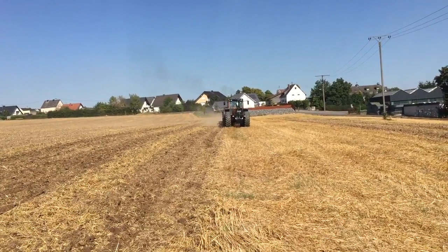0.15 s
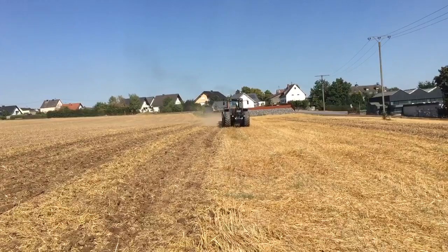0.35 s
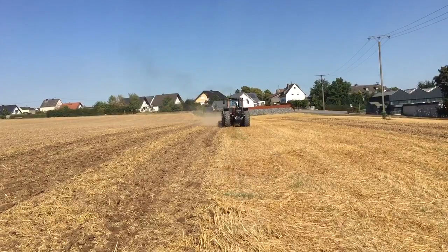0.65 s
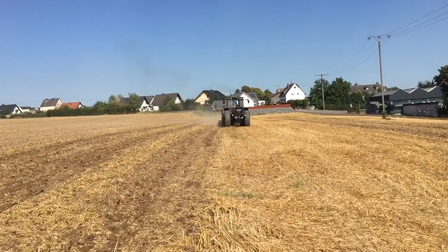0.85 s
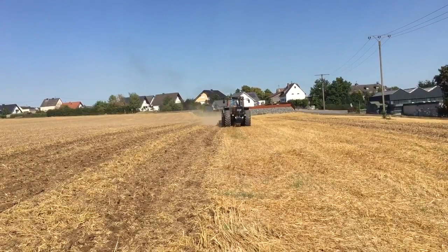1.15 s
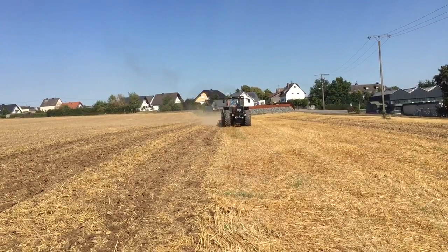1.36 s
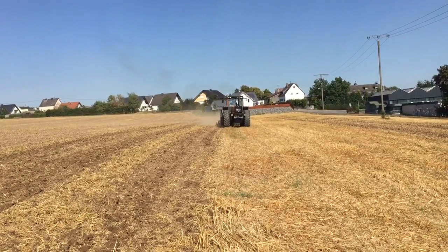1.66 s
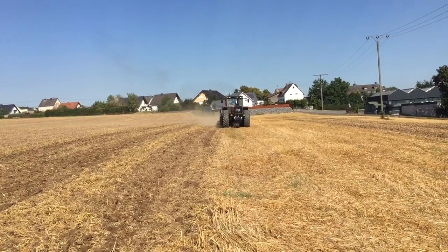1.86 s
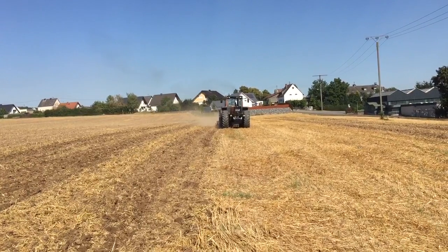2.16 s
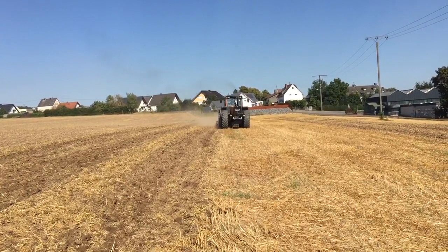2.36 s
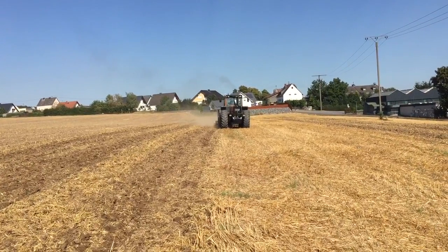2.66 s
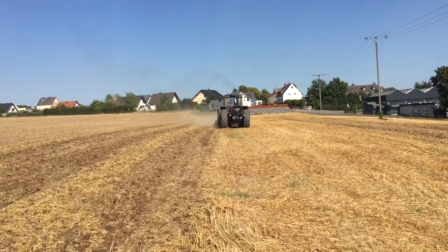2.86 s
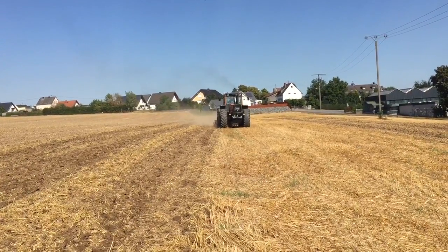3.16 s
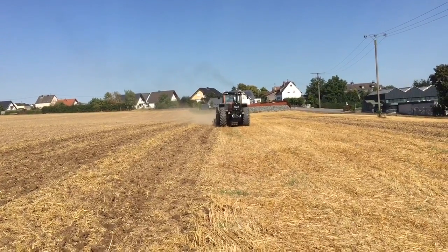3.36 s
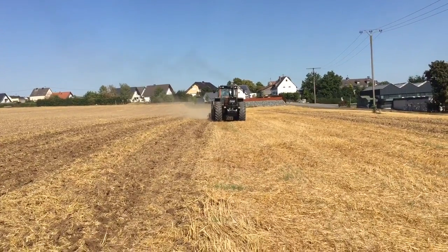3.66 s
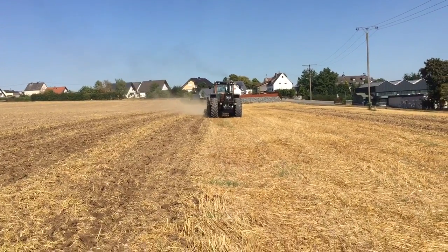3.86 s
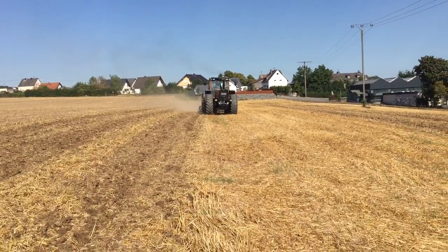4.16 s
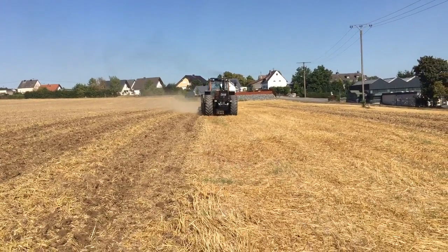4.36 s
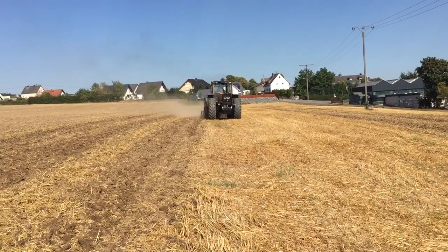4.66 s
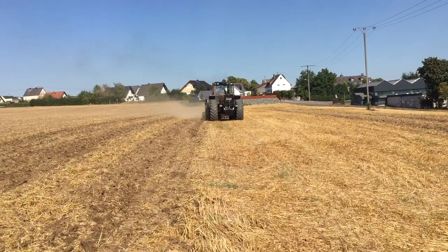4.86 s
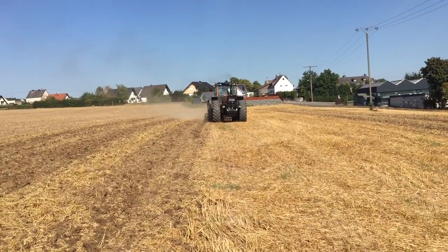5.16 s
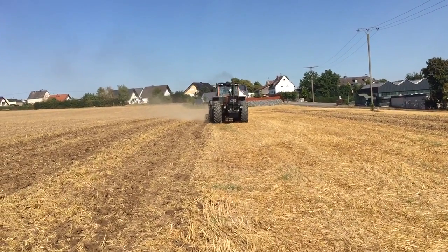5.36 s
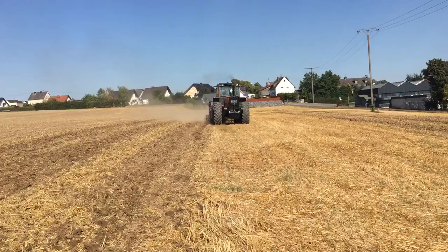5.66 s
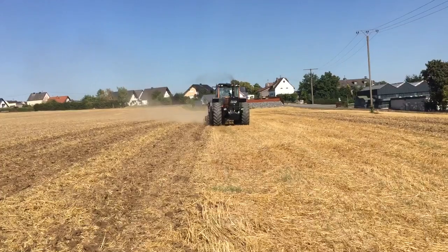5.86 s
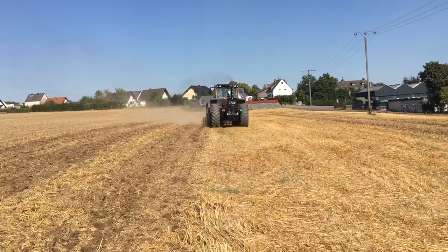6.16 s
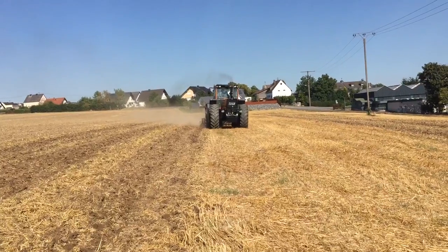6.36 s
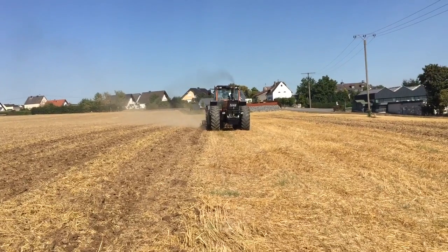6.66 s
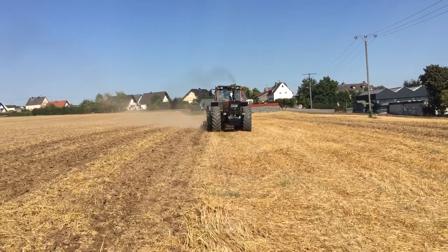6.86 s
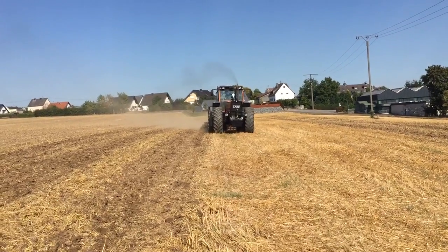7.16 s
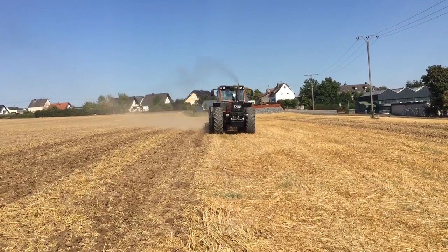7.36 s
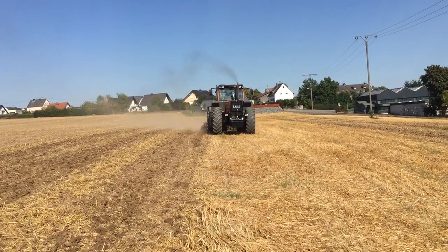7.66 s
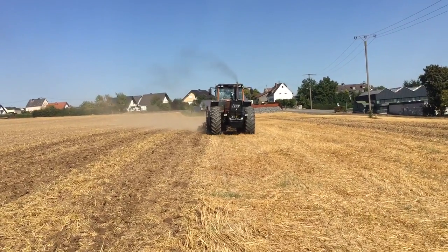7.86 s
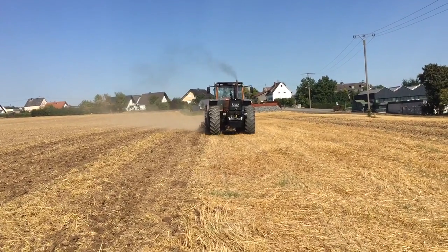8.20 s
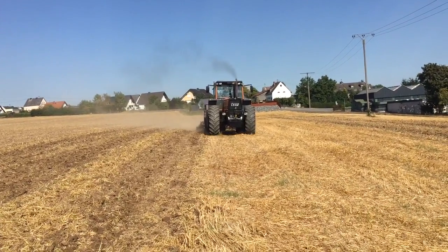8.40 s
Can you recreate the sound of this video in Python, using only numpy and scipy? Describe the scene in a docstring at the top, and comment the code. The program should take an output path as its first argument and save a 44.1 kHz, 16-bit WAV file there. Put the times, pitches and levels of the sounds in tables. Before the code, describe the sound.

Out in an open field, a tractor engine drones under load some way off and slowly comes nearer. Diesel knock and small metallic clinks ride on its low, even hum, while the tyres rumble and a harrow hisses through soil and straw. Close to the microphone there is a light wind rumble and, past the middle, a little faint crackle of dry straw.

```python
"""Tractor harrowing stubble

Open field, microphone on a phone: a six-cylinder diesel drags a harrow straight at it, from 41 to 25 m.
The exhaust hums on the firing rate, the fan sings its blade tone, the turbocharger whistles thinly, and
each cylinder's knock rings block and valve gear. Tyres and frame roar, soil and straw hiss behind.
Close by, a breeze buffets the microphone and a little dry straw ticks."""
import sys
import numpy as np
from scipy import signal
from scipy.io import wavfile
from scipy.ndimage import uniform_filter1d

SR = 44100
rng = np.random.default_rng(int(sys.argv[2]) if len(sys.argv) > 2 else 0)


def master_out(mix):
    """Clip the mix to full scale and print it as 16-bit PCM to the path in sys.argv[1]."""
    frames = np.transpose(np.atleast_2d(mix))
    ceiling = np.clip(frames, -1, 1)
    pcm = np.round(ceiling * 32767).astype(np.int16)
    wavfile.write(sys.argv[1], SR, pcm)


N = 376173
START_DISTANCE_M, PACE_M_PER_S = 41.3, 1.93

# Engine. One four-stroke cycle is one turn and holds six firings.
# The governor hunts under the uneven load: time_s, firing_hz
FIRING_RATE = [(0.0, 70.04), (0.15, 71.04), (0.36, 69.71), (0.56, 70.32), (0.85, 69.39), (1.17, 70.71),
               (1.39, 69.57), (1.78, 70.68), (2.0, 69.77), (2.19, 70.31), (2.34, 69.56), (2.62, 71.36),
               (2.82, 69.67), (3.11, 71.2), (3.37, 70.4), (3.54, 71.2), (3.77, 70.23), (3.96, 71.08),
               (4.09, 70.23), (4.3, 71.3), (4.53, 70.44), (4.93, 71.03), (5.14, 69.98), (5.45, 71.21),
               (5.69, 69.48), (6.02, 70.68), (6.5, 69.57), (6.8, 70.72), (6.99, 69.84), (7.24, 70.52),
               (7.48, 69.69), (7.89, 70.51), (8.07, 69.84), (8.53, 70.13)]
# Exhaust partials beside the firing tone: cycle_multiple, relative_db, waver_db
EXHAUST_PARTIALS = [(4, -21, 3), (9, -9.5, 1), (10, -19, 2), (11, -21, 2), (12, 0, .4), (13, -14, 1.5),
                    (14, -15.5, 2), (15, -12, 1.5), (16, -20, 2), (18, -6.5, .8), (24, -21, 1.5)]
# Those partials swell about their steady rise: time_s, offset_db
EXHAUST_SWELL = [(0, -1), (1.5, -1.5), (2.7, -2.5), (4.5, 1), (6.6, -0.5), (7.5, -0.5), (8.53, -1)]
# Blade tone, a tone near its octave, gear mesh tones: cycle_multiple, relative_db, waver_db
FAN_AND_GEAR_PARTIALS = [(23.115, 0, .6), (46, -21, 4), (58, -20, 3), (72.6, -16, 3), (148.7, -17, 2.5),
                         (164, -22, 2.5), (174, -21, 2.5)]
# Blows within one cycle: place_turns, block_db, valve_gear_db
BLOWS = [(.05, 0, -2), (.13, 0, -12), (.21, -1, 0), (.3, 0, -12), (.37, 2, -4), (.54, -2.5, 0),
         (.63, -6, -12), (.72, -1.5, -4), (.82, -3, -10), (.88, 2, -2), (.96, -4, -12)]
# Modes of the engine block: pitch_hz, width_hz, relative_db, growth_while_nearing_db
BLOCK_MODES = [(538, 58, -8.5, 9.5), (675, 22, -6, 0.5), (842, 41, -6, 1), (958.4, 38, 1.5, 2),
               (1037, 70, -2.5, 3), (1077, 57, -4, 1.5), (1157, 77, -9, -2), (1315, 33, -7, 2),
               (1420, 90, -13, 1), (1590, 37, -10.5, 0), (1705, 47, -10.5, -2.5), (2000, 87, -8.5, -3),
               (2350, 58, -11.5, 4), (1740, 26, -14.5, 5), (991, 38, -3.5, 3.5)]
# Modes of the valve gear: pitch_hz, width_hz, relative_db, growth_while_nearing_db
VALVE_MODES = [(2956, 45, 5, -5), (3112, 63, 6, -3), (3330, 244, -0.5, -3), (3950, 99, -3.5, -3.5),
               (4105, 53, -1, 0), (4300, 69, -1.5, 3), (4480, 56, 0, -1.5), (4725, 49, -1.5, -1),
               (5114, 130, -8.5, 0), (5254, 110, -4, 7), (5540, 130, -4.5, 2), (5740, 490, -9.5, 1),
               (6140, 150, -5.5, 2.5), (7380, 990, -14, 2)]
# Modes near one pitch stand out or sink for a while: start_s, end_s, pitch_hz, offset_db
MODE_SWELLS = [(4.75, 5.2, 2960, 1.5), (5.0, 5.35, 5500, 6.5), (6.2, 8.2, 675, 3), (6.2, 7.2, 848, 1.5),
               (8.1, 8.53, 848, 5), (.55, 1.7, 4000, 3.5), (.55, 1.66, 4330, 5), (.55, 1.66, 4600, 2.5),
               (.6, 1.66, 5250, 5), (2.35, 2.65, 5370, 5), (1.3, 1.8, 3110, 2.5), (2.05, 2.336, 3110, 2.5),
               (3.396, 4.248, 3030, 2.5), (3.7, 4.7, 4380, 2), (3.8, 4.6, 5250, 3), (4.6, 5.4, 6100, 3),
               (5.7, 7.5, 2340, 4), (5.9, 7.3, 5250, 2), (5.9, 6.9, 4200, 0), (6.6, 8.1, 2950, 2),
               (7.0, 7.32, 6100, 4), (7.15, 8.448, 1735, 7), (6.75, 7.45, 5000, 1), (7.45, 7.88, 5250, -3),
               (7.45, 8.05, 5530, 2), (7.9, 8.53, 5250, 0.5), (8.15, 8.45, 6160, 4),
               (2.405, 3.355, 3030, 2.5), (5.6, 7.5, 1030, 0), (7.5, 8.2, 3350, 2.5)]
# The sharpest blows, high on the valve gear and low on the block: time_s, level_db, pitch_hz
CLINKS = [(.084, -33, 3120), (.094, -36, 4220), (.596, -31, 3080), (.631, -40, 980), (.6665, -29, 3100),
          (0.693, -29, 3090), (.698, -33, 4100), (.757, -39, 4280), (.8406, -38, 4550), (.9139, -37, 4310),
          (1.0147, -29, 4680), (1.098, -34, 5250), (1.133, -35, 970), (1.212, -36, 4370),
          (1.215, -34, 5240), (1.242, -34, 4300), (1.386, -36, 5190), (1.4078, -35, 4090),
          (1.4847, -36, 3090), (1.499, -33, 3120), (1.529, -35, 4300), (1.556, -32, 4280),
          (1.577, -29, 1010), (1.5839, -33, 4100), (1.613, -35, 5260), (1.627, -32, 3090),
          (1.784, -34, 3080), (1.866, -39, 950), (2.105, -38, 970), (2.1215, -28, 3110), (2.345, -30, 1020),
          (2.47, -34, 5220), (2.494, -29, 3050), (2.509, -33, 3100), (2.525, -36, 5350), (2.53, -30, 2920),
          (2.579, -37, 3130), (2.8638, -32, 3110), (2.886, -35, 973), (2.896, -28, 3040),
          (3.037, -33, 3080), (3.361, -26, 1000), (3.527, -33, 968), (3.566, -36, 3050),
          (3.7071, -29, 3060), (3.711, -39, 976), (3.77, -38, 5210), (3.796, -34, 3080),
          (3.8208, -32, 4390), (3.8528, -32, 3100), (3.8836, -33, 5250), (3.911, -30, 3150),
          (4.076, -31, 3100), (4.1037, -35, 2950), (4.1046, -31, 4340), (4.136, -35, 850),
          (4.193, -28, 3090), (4.2467, -31, 4380), (4.2498, -29, 5160), (4.274, -32, 4300),
          (4.295, -34, 5210), (4.3896, -31, 3120), (4.5042, -32, 5210), (4.5288, -30, 3020),
          (4.674, -36, 4420), (4.761, -35, 5250), (4.792, -33, 6100), (4.848, -33, 2970),
          (4.957, -33, 3160), (5.018, -33, 2960), (5.042, -32, 2960), (5.042, -35, 5170),
          (5.071, -31, 2980), (5.087, -28, 3080), (5.115, -33, 5240), (5.133, -36, 1015), (5.197, -34, 952),
          (5.244, -34, 3040), (5.272, -31, 3180), (5.297, -33, 4350), (5.326, -31, 4400),
          (5.3557, -33, 4220), (5.525, -30, 3120), (5.582, -31, 4200), (5.664, -28, 990),
          (5.724, -32, 5190), (5.781, -35, 4180), (5.784, -31, 3110), (5.9514, -27, 4330),
          (6.0362, -31, 4400), (6.045, -32, 970), (6.0608, -30, 3020), (6.122, -27, 5270),
          (6.166, -31, 5300), (6.221, -31, 2346), (6.2363, -36, 5230), (6.2936, -31, 5300),
          (6.3803, -23, 5370), (6.521, -27, 980), (6.5506, -34, 5200), (6.562, -29, 3110),
          (6.582, -32, 5310), (6.607, -27, 990), (6.6234, -36, 5350), (6.666, -26, 5100),
          (6.7193, -29, 2980), (6.76, -39, 980), (6.774, -35, 3090), (6.804, -26, 3100),
          (6.8369, -27, 5290), (6.8894, -27, 3110), (7.0509, -31, 5240), (7.068, -30, 6120),
          (7.0923, -28, 5220), (7.1782, -36, 5190), (7.206, -33, 885), (7.239, -29, 6150),
          (7.289, -32, 2970), (7.31, -29, 966), (7.361, -28.5, 1036), (7.4011, -28, 5070),
          (7.43, -30, 3060), (7.4919, -31, 5550), (7.636, -32, 4340), (7.646, -30, 3020),
          (7.692, -32, 4320), (7.705, -32, 3020), (7.876, -30, 5500), (7.9473, -25, 5400),
          (7.9768, -28, 5200), (8.092, -34, 5300), (8.151, -29, 5220), (8.174, -28, 3180),
          (8.1766, -28, 5300), (8.23, -32, 1064), (8.234, -27, 3170), (8.2906, -25, 4300),
          (8.2922, -32, 3130), (8.352, -33, 6080), (8.464, -30, 3130), (8.479, -30, 980)]
# Valve clatter and soil hiss drift about their steady rise: time_s, offset_db
TREBLE_DRIFT = [(0, 0), (.35, -3), (.8, 0.5), (1.1, -1.5), (1.45, 2), (1.9, -1.5), (2.5, 1), (3.25, -1.5),
                (4.0, 0), (4.6, 0), (5.5, -1.5), (6.1, .5), (7.0, 1.5), (8.53, 1)]
# Whistle of the turbocharger: time_s, pitch_hz, level_db
TURBO_WHISTLE = [(0, 13950, -77), (1, 13850, -75), (2.05, 14000, -69), (2.6, 14050, -70), (3.2, 13800, -74),
                 (4.2, 13680, -73), (5.2, 13650, -73), (6.1, 13800, -68), (6.6, 13850, -66),
                 (7.2, 13950, -68), (8.53, 13900, -66)]

# Roar of tyres, frame and tines: frequency_hz, relative_db
ROAR_SPECTRUM = [(100, -19), (170, 9), (240, 7.5), (320, 1), (450, -2.5), (620, 2), (750, 0), (900, 4),
                 (1900, -0.5), (2200, -4.5), (2700, -4.5), (3300, -6.5), (5000, -10.5), (9000, -57)]
# Hiss of soil and straw in the harrow: frequency_hz, relative_db
SOIL_SPECTRUM = [(3000, -47), (5000, 3), (6500, 2), (7500, 0), (8800, -5.5), (9600, -2.5), (10100, -4.5),
                 (10600, -12.5), (12000, -9.5), (13500, -12), (13900, -13), (14400, -21), (16000, -22),
                 (17100, -36)]
# Treble that the air gives back over the approach: frequency_hz, change_db
AIR_TREBLE = [(7000, -2.5), (10000, -0.5), (13000, 5), (17000, 26)]

# Breeze on the microphone: frequency_hz, relative_db
WIND_SPECTRUM = [(18, -35), (30, -17), (45, -9), (70, 18), (110, 0.5), (170, 0.5), (260, -18.5), (400, -69)]
# Buffets of the breeze: time_s, boost_db
BUFFETS = [(1.2, 2.6), (3.17, 4.8), (3.4, 9.8), (3.7, 5.4), (6.55, 7.4), (7.8, 4.5)]
# Ticks of dry straw close by: start_s, unfiltered_level_db
STRAW_TICKS = [(4.567, -48), (5.264, -46), (5.5672, -47), (5.586, -46), (5.604, -47), (5.7324, -42),
               (5.8785, -41), (5.889, -36), (5.8954, -42), (5.9134, -46), (5.953, -47), (6.0048, -45),
               (6.07, -37), (6.086, -47), (6.121, -48), (6.15, -45), (6.58, -46), (7.294, -46), (7.42, -45),
               (8.019, -44), (8.324, -46)]
# Fine crackle of that straw: time_s, unfiltered_level_db
STRAW_CRACKLE = [(0, -78), (5.0, -68), (5.6, -54), (6.15, -53), (6.5, -64), (8.53, -61)]


def tractor():
    """Tractor and harrow from the front; one crankshaft times the exhaust, the fan and the knocks."""
    turns = 0.355 + np.cumsum(curves(FIRING_RATE)[0]) / SR / 6
    hum = exhaust(turns) + fan_and_gears(turns)
    block = engine_block(turns)
    clatter = knocks(turns, column=2, width_turns=0.027, spread_db=2.5, repeat=0.6, steady_db=0)
    valves = valve_gear(clatter, turns)
    roar = running_gear()
    treble = gain_of(curves(TREBLE_DRIFT)[0]) * (valves + soil_hiss(clatter))
    return hum + block + treble + clinks() + roar + turbocharger()


def exhaust(turns):
    """Gas pulses hum at the firing rate, with weaker partials on other multiples of the cycle."""
    firing = smooth_gain(0.12 * drift(8.4)) * np.sqrt(2) * np.cos(2 * np.pi * 6 * turns)
    partials = gain_of(curves(EXHAUST_SWELL)[0]) * cycle_tones(turns, EXHAUST_PARTIALS)
    return approach(-22.5, steepness=1.1) * firing + approach(-36.3, steepness=1.45) * partials


def fan_and_gears(turns):
    """Passing blades and meshing teeth sing in step with the crankshaft."""
    return approach(-39.5, steepness=0.89) * cycle_tones(turns, FAN_AND_GEAR_PARTIALS)


def cycle_tones(turns, partials, lag_turns=0.05, flip_multiple=16):
    """Wavering sines on multiples of the cycle, slightly delayed, the upper ones inverted."""
    return sum(smooth_gain(db + waver_db * drift(12, low_hz=1.2)) * (1 if multiple < flip_multiple else -1)
               * np.sqrt(2) * np.cos(2 * np.pi * (multiple * turns - lag_turns * (multiple - 6)))
               for multiple, db, waver_db in partials)


def engine_block(turns):
    """Short diesel knocks, much alike from cycle to cycle, ring the block."""
    thumps = knocks(turns, column=1, width_turns=0.01, spread_db=5.5, repeat=0.88, steady_db=2)
    ringing = ring(thumps, turns, BLOCK_MODES, spread_db=1.3, waver_db=0, waver_hz=8.9)
    return approach(-35.5, steepness=1.06) * ringing


def valve_gear(clatter, turns):
    """The clatter rings the high modes of the valve gear; moving air makes them waver."""
    ringing = ring(clatter, turns, VALVE_MODES, spread_db=2, waver_db=0.47, waver_hz=11)
    return approach(-39.5, steepness=0.62) * ringing


def knocks(turns, column, width_turns, spread_db, repeat, steady_db):
    """A noise burst around each blow over a steady rattle; part of the noise repeats every cycle."""
    luck = rng.uniform(-1, 1, (int(turns[-1]) + 2, len(BLOWS)))
    envelope = np.zeros(N)
    for k, blow in enumerate(BLOWS):
        cycle = np.round(turns - blow[0]).astype(int)
        bell = np.exp(-.5 * ((turns - blow[0] - cycle) / width_turns) ** 2)
        envelope += gain_of(blow[column] + spread_db * luck[:, k])[cycle] * bell
    age = turns / 24  # the repeating pattern melts into a new one every two dozen cycles
    cycle_samples = 3760
    patterns = rng.standard_normal((int(age[-1]) + 2, cycle_samples))
    current, place = age.astype(int), (turns % 1 * cycle_samples).astype(int)
    blend = np.pi / 2 * (age % 1)
    pattern = np.cos(blend) * patterns[current, place] + np.sin(blend) * patterns[current + 1, place]
    noise = repeat * pattern + np.sqrt(1 - repeat ** 2) * rng.standard_normal(N)
    return (envelope + gain_of(steady_db)) * noise


def ring(strikes, turns, modes, spread_db, waver_db, waver_hz):
    """Two-pole modes, each struck with a random force per firing; their sum is held near rms 1."""
    out, t = np.zeros(N), np.arange(N) / SR
    firing = np.round(6 * turns - .3).astype(int)
    fade_s = 0.05 * np.array([-1, 1, -1, 1])
    for k, (hz, width_hz, db, growth_db) in enumerate(modes):
        level_db = db + growth_db * (t / t[-1] - .5) + waver_db * drift(waver_hz)
        for start_s, end_s, swell_hz, swell_db in MODE_SWELLS:
            if abs(hz - swell_hz) < 0.035 * hz:
                level_db += swell_db * np.interp(t, np.repeat([start_s, end_s], 2) + fade_s, [0, 1, 1, 0])
        force = gain_of(spread_db * rng.standard_normal(firing[-1] + 1))[firing]
        b, a = signal.iirpeak(hz, hz / width_hz, SR)
        out += (-1) ** k * smooth_gain(level_db) * signal.lfilter(b, a, force * strikes)
    return out / np.sqrt(uniform_filter1d(out ** 2, size=SR // 2))


def clinks(rise_periods=17):
    """A hard blow rings one part briefly, as a rough pair of close tones that swells and fades."""
    t = np.arange(2600) / SR
    out = np.zeros(N + len(t))
    for time_s, db, hz in CLINKS:
        detune, phase = rng.uniform(-1, 1, 2)
        partner = np.sin(2 * np.pi * (hz * (1 + 0.06 * detune) * t + phase))
        pair = np.sin(2 * np.pi * hz * t) + 0.21 * partner
        age = t * hz / rise_periods
        envelope = (age * np.exp(1 - age)) ** 4
        start_s = time_s - .0015 - rise_periods / 2 / hz
        out[round(start_s * SR):][:len(t)] += gain_of(db - 2.5) * envelope * pair
    return out[:N]


def running_gear():
    """Tyres, frame and tines roar broadly across the field."""
    return approach(-37.5, steepness=1.3) * shaped_noise(ROAR_SPECTRUM, patchy_db=1, gusty_db=1)


def soil_hiss(clatter):
    """Soil and straw hiss behind the tractor; the peaks of the valve clatter pulse through the hiss."""
    power = 1 + 0.032 * unit_rms(uniform_filter1d(clatter ** 2, size=90) - np.mean(clatter ** 2))
    hiss = shaped_noise(SOIL_SPECTRUM, patchy_db=1.5, gusty_db=0.6, through_air=True)
    return approach(-48.5, steepness=1.55) * np.sqrt(np.maximum(power, 0)) * hiss


def turbocharger(width_hz=260):
    """A thin, fuzzy whistle: slow noise carried on a wandering pitch."""
    hz, db = curves(TURBO_WHISTLE)
    lowpass = signal.butter(2, width_hz / 2, fs=SR, output="sos")
    real, imag = signal.sosfilt(lowpass, rng.standard_normal((2, N)))
    carrier = np.exp(2j * np.pi * np.cumsum(hz) / SR)
    return gain_of(db) * unit_rms(((real + 1j * imag) * carrier).real)


def wind(level_db=-39.5, buffet_s=0.015):
    """A light, lumpy breeze right on the microphone, with a few buffets."""
    t = np.arange(N) / SR
    buffets_db = sum(db * np.exp(-.5 * ((t - time_s) / buffet_s) ** 2) for time_s, db in BUFFETS)
    gain = smooth_gain(level_db + 0.59 * drift(6.5) + buffets_db)
    return gain * shaped_noise(WIND_SPECTRUM, patchy_db=-0.5, gusty_db=1)


def straw(tick_decay_s=0.0038, snaps_per_s=500):
    """Dry straw near the microphone: short gritty ticks within a fine crackle."""
    out, t = np.zeros(N), np.arange(1200) / SR
    shape = (len(STRAW_TICKS), len(t))
    grit = rng.standard_normal(shape) * np.sqrt(rng.exponential(1, shape))
    for (start_s, db), noise in zip(STRAW_TICKS, grit):
        out[round(start_s * SR):][:len(t)] += gain_of(db) * noise * np.exp(-t / tick_decay_s)
    snaps = (rng.random(N) < snaps_per_s / SR) * gain_of(2.2 * np.minimum(rng.exponential(1, N), 4))
    crackle = signal.lfilter([1], [1, -.97], snaps) * rng.standard_normal(N)
    out += gain_of(curves(STRAW_CRACKLE)[0]) * unit_rms(crackle)
    return signal.sosfilt(signal.butter(1, [9500, 15000], "band", fs=SR, output="sos"), out)


def approach(halfway_db, steepness):
    """Gain as the tractor nears the microphone; a steepness of 1 is free spreading."""
    distance_m = START_DISTANCE_M - PACE_M_PER_S * np.arange(N) / SR
    return gain_of(halfway_db) * (distance_m[N // 2] / distance_m) ** steepness


def shaped_noise(spectrum, patchy_db, gusty_db, through_air=False):
    """Noise of rms 1 with the given spectrum, drifting patches, and gusts shared by all bands."""
    hz, frames = np.fft.rfftfreq(1024, 1 / SR), N // 256 + 5
    real, imag, patches = rng.standard_normal((frames, 513, 3)).T
    patches = unit_rms(uniform_filter1d(uniform_filter1d(patches, size=12, axis=0), size=12, axis=1))
    gusts = unit_rms(uniform_filter1d(rng.standard_normal(frames), size=6))
    db = spectrum_db(spectrum, hz) + patchy_db * patches + gusty_db * gusts
    if through_air:
        db += spectrum_db(AIR_TREBLE, hz) * np.linspace(-.5, .5, frames)
    return unit_rms(signal.istft((real + 1j * imag) * gain_of(db), nperseg=1024, noverlap=768)[1][:N])


def drift(top_hz, low_hz=0.29):
    """Random wander of rms 1, at rates from low_hz to top_hz."""
    t = np.arange(N // 512 + 2) * 512 / SR
    hz = np.geomspace(low_hz, top_hz, num=16)[:, None]
    waves = np.sin(2 * np.pi * (hz * t + rng.random(hz.shape))) / np.sqrt(hz)
    return np.repeat(unit_rms(waves.sum(0)), 512)[:N]


def curves(rows):
    """The columns after time_s, one value a sample."""
    time_s, *columns = np.transpose(rows)
    return [np.interp(np.arange(N) / SR, time_s, column) for column in columns]


def spectrum_db(points, hz):
    """Levels at hz, interpolated over log frequency."""
    point_hz, db = np.transpose(points)
    return np.interp(np.log(hz + 1), np.log(point_hz), db)[:, None]


def smooth_gain(db):
    """Gain without steps."""
    return uniform_filter1d(gain_of(db), size=1024)


def gain_of(db):
    return 10 ** (np.asarray(db) / 20)


def unit_rms(x):
    return x / np.sqrt(np.mean(x ** 2) + 1e-20)


def scene():
    """The tractor out in the field, breeze and straw close by, in mono."""
    return (tractor() + wind() + straw())[None]


def record(dry):
    """The phone passes sound up to 17.1 kHz."""
    lowpass = signal.firwin(1023, 17100, window=("kaiser", 9), fs=SR)
    return signal.oaconvolve(dry, lowpass[None], "same")


dry = scene()
out = record(dry)
master_out(out)
```